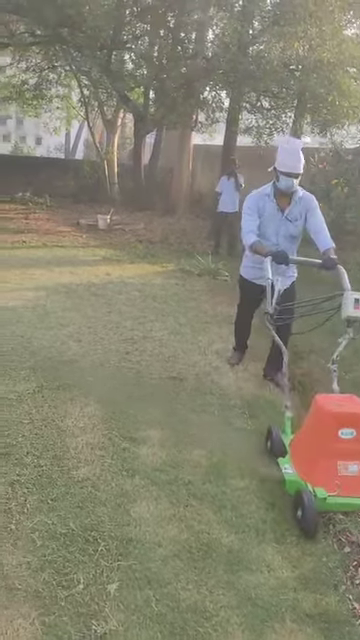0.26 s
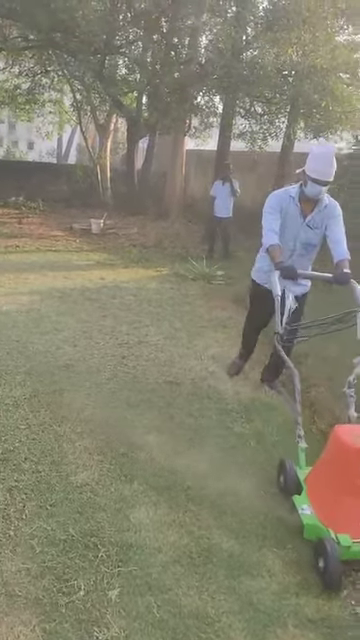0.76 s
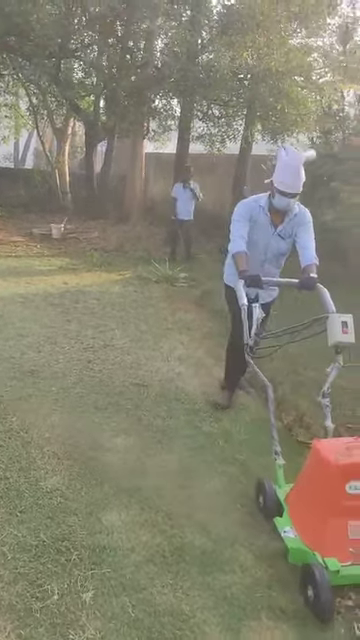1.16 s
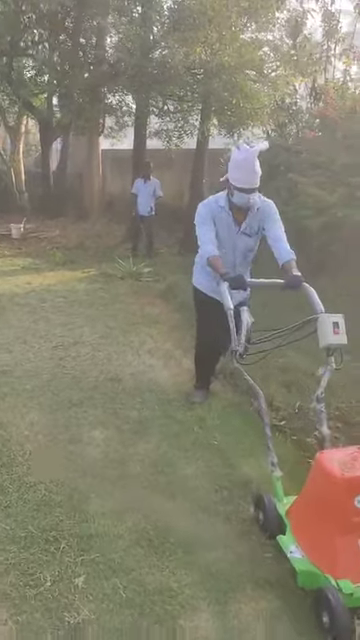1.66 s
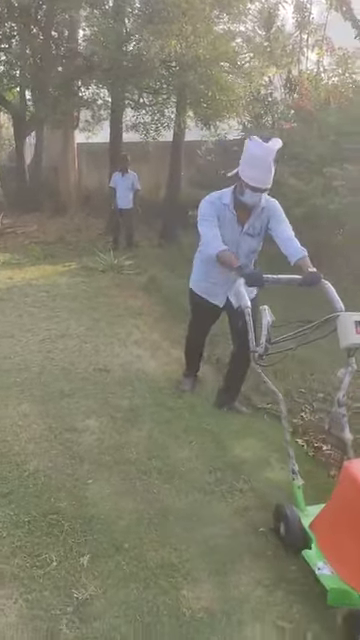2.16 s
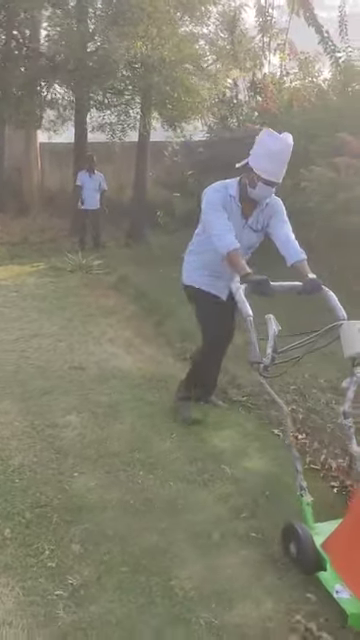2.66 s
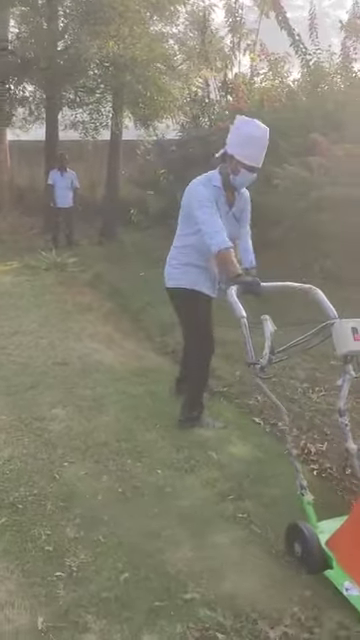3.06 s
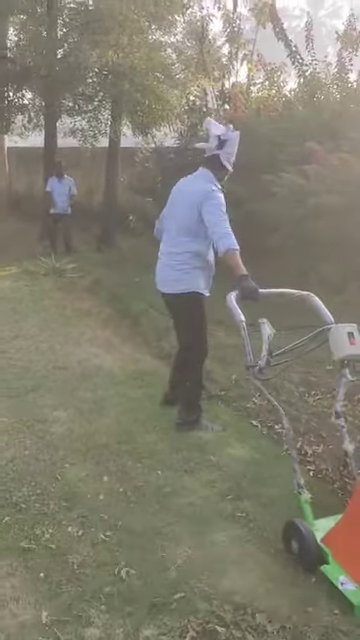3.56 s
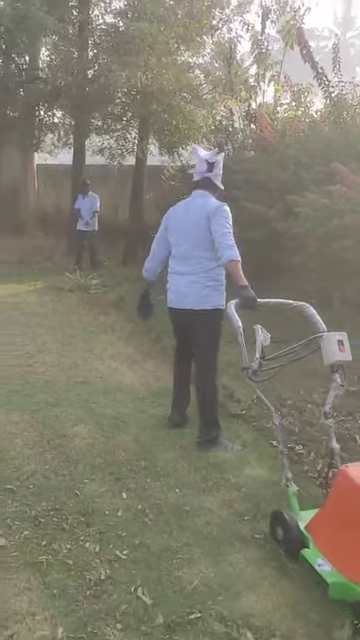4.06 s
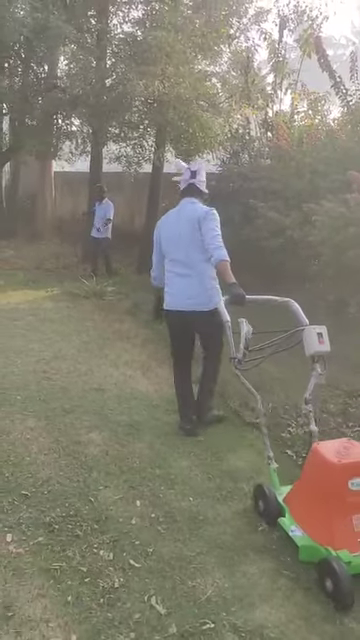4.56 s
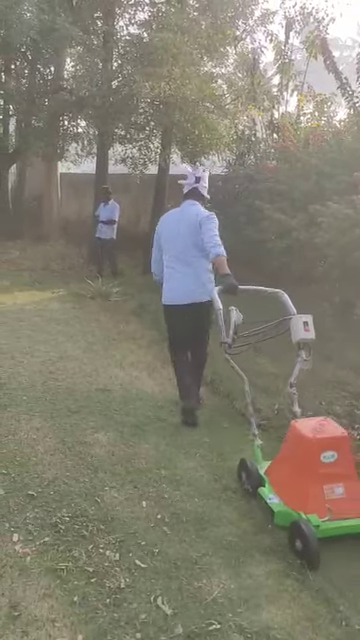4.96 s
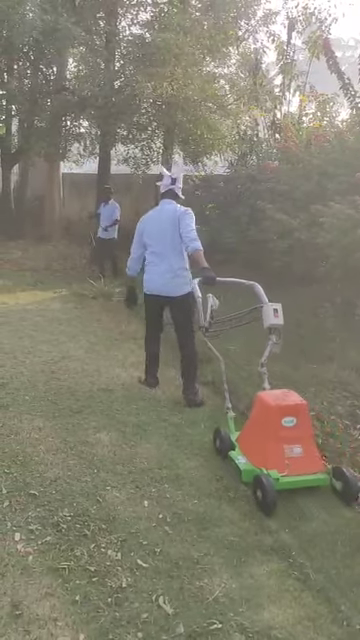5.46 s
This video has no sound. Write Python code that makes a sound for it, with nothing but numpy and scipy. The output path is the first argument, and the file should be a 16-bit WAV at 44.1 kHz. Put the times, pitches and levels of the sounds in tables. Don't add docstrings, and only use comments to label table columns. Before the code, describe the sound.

For about 5.7 seconds an electric rotary mower runs continuously a few steps away on an open lawn. A low hum near 100 Hz, with a stronger octave above, rises very slightly over the first two seconds and then holds, its overtones wavering as the deck rocks. Around it is a broad, airy midrange roar, fullest from about 2 to 5 seconds and easing near the end. Shredded grass and dry leaves hiss in grainy bursts, strongest around 2.2 seconds and much thinner after 3.6. Short hard ticks of twigs and stones come at about 0.8, 1.5, 1.8, 2.1, 2.6, 3.1-3.4, 4.0 and 4.2 seconds. A distant hoarse crow caws at 0.8, 1.7, 2.6 and, fainter, 3.3; tiny falling chirps come at 4.9 and 5.55. The phone stereo is left-weighted in the lows, with shifting phase, narrow ringing highs and patchy, compressed treble.

```python
import sys
import numpy as np
from scipy import signal
from scipy.fft import rfft, irfft, dct, next_fast_len
from scipy.io import wavfile
from scipy.ndimage import uniform_filter1d

SR = 44100
rng = np.random.default_rng(int(sys.argv[2]) if len(sys.argv) > 2 else 0)


def to_linear_factor(level_db):
    exponent = np.asarray(level_db, float) / 20
    return 10 ** exponent


def master(y):
    cut = np.clip(np.atleast_2d(y).T, -1, 1)
    pcm = np.round(cut * 32767)
    wavfile.write(sys.argv[1], SR, pcm.astype(np.int16))


N = 252232
TIME = np.arange(N) / SR


def evened(x):
    return x / np.sqrt(np.mean(x ** 2) + 1e-20)


def read(points, hz):
    f, value = np.transpose(points)
    return np.interp(np.log(hz + 1), np.log(f + 1), value)


def column(rows, count):
    columns = np.transpose(rows)
    return np.interp(TIME, columns[0], columns[count])


def swells(rows):
    s, db, width = np.transpose(rows)
    coarse = TIME[::64]
    bells = np.exp(-((coarse[:, None] - s) / width) ** 2)
    return np.interp(TIME, coarse, bells @ db)


def wander(top_hz, count):
    size = next_fast_len(N)
    z = rfft(rng.standard_normal((count, N)), size)
    z = z / (1 + (np.fft.rfftfreq(size, 1 / SR) / top_hz) ** 4)
    return evened(irfft(z, size)[:, :N])


def air(shape, patchy_db, size):
    hz = np.fft.rfftfreq(size, 1 / SR)
    a, b, c, d, patches = rng.standard_normal((4 * N // size + 5, len(hz), 5)).T
    patches = uniform_filter1d(patches, size=8, axis=0)
    patches = evened(uniform_filter1d(patches, size=10, axis=1))
    z = np.array([a + 1j * b, c + 1j * d])
    z = z * to_linear_factor(read(shape, hz)[:, None] + patchy_db * patches)
    return signal.istft(z, nperseg=size, noverlap=3 * size // 4)[1][:, :N]


def band_rms(x, lo_hz, hi_hz):
    power, hz = abs(rfft(x)) ** 2, np.fft.rfftfreq(N, 1 / SR)
    return np.sqrt(2 * power[(hz > lo_hz) & (hz < hi_hz)].sum()) / N


# start_s, start_hz, end_hz, length_s, level_db
CHIRPS = [
    (4.905, 4750, 4050, .06, -46),
    (5.55, 4700, 4200, .055, -48),
]


def songbird():
    out = np.zeros(N)
    for start, start_hz, end_hz, length, db in CHIRPS:
        u = np.clip((TIME - start) / length, 0, 1)
        hz = start_hz + (end_hz - start_hz) * u
        whistle = np.sin(2 * np.pi * np.cumsum(hz) / SR)
        flutter = 1 + 0.62 * wander(170, count=1)[0]
        out += to_linear_factor(db) * np.sin(np.pi * u) * flutter * whistle
    return out


# start_s, length_s, top_hz, level_db
CAWS = [
    (.84, 0.25, 1582, -39.5),
    (1.73, 0.22, 1600, -40),
    (2.559, 0.252, 1696, -39.5),
    (3.34, .25, 1575, -43),
]


def crow():
    rise = 0.28
    first, sag, drop = 0.86, 0.0426, 0.0585
    out = np.zeros(N)
    for start, length, top_hz, db in CAWS:
        u = np.clip((TIME - start) / length, 0, 1)
        bend = first + (1 - first) * np.minimum(u / rise, 1)
        bend = bend - sag * np.maximum(u - rise, 0) - drop * u ** 4
        hz = top_hz * bend * (1 + 0.0039 * wander(84, count=1)[0])
        angle = 2 * np.pi * np.cumsum(hz) / SR
        rasp = 1 + 0.55 * wander(160, count=1)[0]
        swell = abs(np.sin(np.pi * u)) ** 0.47
        out += to_linear_factor(db + 5) * rasp * swell * (np.sin(angle) + 0.11 * np.sin(angle * 4 / 3))
    return out


# time_s, blade_pass_hz
SPEED = [(0, 98.1), (.5, 98.4), (.8, 98.75), (1.25, 98.8), (1.6, 99.3), (2.3, 99.55), (2.8, 99.42),
         (4, 99.45), (5.72, 99.35)]


def blade_angle():
    return 2 * np.pi * np.cumsum(column(SPEED, count=1)) / SR


# time_s, roar_db, hiss_db
EFFORT = [(0.0, -32.5, -34.5), (0.03, -36.5, -35), (0.09, -35, -37.5), (0.46, -34.5, -34.5),
          (0.72, -36.5, -36), (0.83, -34, -35), (1.23, -34, -38), (1.67, -34.5, -36), (2.12, -34.5, -33.5),
          (2.2, -33, -32), (3.38, -32.5, -34), (3.44, -34.5, -35.5), (3.63, -33, -39), (5.32, -37, -44),
          (5.7, -38, -44), (5.72, -33, -49)]


def effort_db():
    return column(EFFORT, count=1), column(EFFORT, count=2)


# pitch_hz, level_db per Hz
ROAR = [(25, -8), (50, -18), (75, -6.5), (120, -7.5), (170, 3), (240, 10), (350, 4.5), (450, -0.5),
        (850, 0.5), (1100, -2.5), (1600, -10), (2200, -13.5), (4000, -17.5), (9000, -53.5)]


def roar():
    x = air(ROAR, patchy_db=1.2, size=2048)
    throb = 1 + 0.075 * np.cos(blade_angle()) + 0.044 * np.cos(2 * blade_angle())
    return x * throb / band_rms(x[0], 578, 1830) * to_linear_factor(effort_db()[0])


TONES_DB = [-2, 5.5, -1.5, -3.5]
# time_s, change_db, half_width_s
ROCK_1 = [
    (0.0, 1.5, 0.063),
    (0.8, -1, 0.13),
    (1.3, -6.5, 0.18),
    (2.5, 0.5, .15),
    (3.2, -3.5, 0.14),
    (4.199, 2, 0.4),
    (5.18, -4, 0.044),
]
ROCK_2 = [(.17, -14, .08), (.36, 4, .05), (.49, -17.5, 0.086), (.72, 4, 0.075), (.85, -11.5, 0.076),
          (1.02, 4, 0.078), (1.65, -4, 0.037), (1.93, -7, 0.021), (2.21, -12.5, 0.083), (2.42, 1.5, 0.084),
          (2.62, -12, 0.12), (3.3, 4, 0.66), (3.93, 3, 0.061), (4.08, -10.5, 0.067), (4.18, 4.5, 0.075),
          (4.43, -6.5, .04), (4.95, 1.5, 0.027), (5.25, 7.5, .05), (5.4, -6.5, .04), (5.55, 3.5, .12)]
ROCK_3 = [(.05, -15.5, 0.042), (.19, -7, 0.035), (.42, 8, 0.049), (.56, -10.5, 0.026), (.64, 6, 0.11),
          (1.27, 6, 0.16), (1.77, 6, 0.038), (1.94, -10, .04), (2.3, 7.5, 0.17), (2.55, 3, 0.037),
          (2.78, -8.5, 0.064), (2.9, 7.5, 0.15), (3.2, -11, 0.027), (3.34, 1, 0.071), (3.56, -15.5, 0.046),
          (3.76, 7.5, 0.079), (4.07, 5.5, 0.046), (4.25, -6, 0.1), (4.459, 9, .05), (4.88, 6, 0.064),
          (4.95, -14, 0.028), (5.04, 4, .05), (5.23, -3, 0.026), (5.36, 6, 0.084), (5.62, -23, 0.15)]
ROCK_4 = [(.1, 7, 0.066), (.4, -8.5, .05), (.59, 9, 0.091), (.87, 4.5, 0.12), (1.1, 6, 0.022),
          (1.65, 5.5, 0.57), (2.21, -4, 0.055), (2.55, -9, .03), (2.82, 7, 0.14), (3.1, -0.5, 0.059),
          (3.45, -2.5, 0.24), (3.95, 3, 0.13), (4.17, 3.5, .05), (4.57, 4, .05), (4.73, -5.5, 0.054),
          (5.03, -2.5, .04), (5.17, 6, 0.021), (5.5, 3.5, 0.06)]
# order, level_db against the roar
ORDERS_DB = [(1, -13.5), (3, -0.5), (5, -26), (7, -6), (10, -7), (12, -8), (14, -4.5), (16, -10),
             (18, -7.5)]


def hum():
    angle, roar_db = blade_angle(), effort_db()[0]
    shakes = (0.045, 0.077, 0.18, 0.17)
    rocks = (ROCK_1, ROCK_2, ROCK_3, ROCK_4)
    out = 0
    for k, shake, db, rock in zip(range(1, 5), shakes, TONES_DB, rocks):
        re, im = wander(6.6, count=2)
        path = 2 * np.pi * rng.random() + 0.59 * wander(0.47, count=1)[0]
        tone = (1 + shake * (re + 1j * im)) * np.exp(1j * (k * angle + path))
        out = out + to_linear_factor(-31 + 0.57 * (roar_db + 36) + db + swells(rock)) * tone.real
    for order, db in ORDERS_DB:
        re, im = wander(6.2, count=2)
        line = (0.5 + 0.5 * (re + 1j * im)) * np.exp(0.5j * order * angle)
        out = out + to_linear_factor(roar_db + db) * line.real
    return out


# pitch_hz, level_db per Hz
HISS = [(300, -17), (1500, 6.5), (2400, -6.5), (2900, 5.5), (3500, -6), (4000, 1), (4250, -22.5),
        (4550, -1), (5300, 0), (5600, -3), (10000, -0.5), (11200, -11.5), (14000, -11), (15500, -16)]
# time_s, change_db, half_width_s
MOUTHFULS = [(.03, 2, 0.018), (.605, 4.5, 0.016), (.87, 2, 0.057), (1.07, 2.5, 0.054), (1.37, -1, .03),
             (1.535, 4.5, 0.0096), (1.67, 2.5, 0.094), (1.92, 1.5, 0.033), (2.08, 1, 0.034),
             (2.105, -3, 0.019), (2.15, -0.5, 0.013), (2.175, -4, 0.011), (2.24, 0, .03), (2.37, 3, 0.017),
             (3.1, 3.5, 0.029), (3.26, 2, 0.064), (3.335, -0.5, .015), (3.36, 4.5, 0.005), (5.51, 1, .04)]
# start_s, level_db, decay_t60_s
STRIKES = [(0.8043, -8, 0.025), (0.856, -20, 0.028), (1.522, -10, 0.039), (1.5643, -29, 0.026),
           (1.8243, -14.5, 0.03), (2.0753, -11.5, 0.027), (2.2448, -22, 0.034), (2.5157, -20, 0.042),
           (2.582, -7.5, 0.026), (3.0624, -9, 0.014), (3.0839, -15, 0.024), (3.202, -11.5, 0.032),
           (3.359, -11, 0.036), (4.0306, -12, 0.019), (4.2045, -6.5, 0.01), (5.5518, -22, 0.044)]


def shredding():
    x = air(HISS, patchy_db=1.5, size=512)
    x = x / band_rms(x[0], 5840, 11100)
    bursts = to_linear_factor(0.7 * wander(83, count=1)[0]) * (1 + 0.095 * np.cos(blade_angle()))
    snaps = to_linear_factor(4.9 * np.minimum(rng.exponential(1, N), 4)) * (rng.random(N) < 250 / SR)
    bursts = bursts + 0.082 * signal.oaconvolve(snaps, to_linear_factor(-60 * TIME[:900] / 0.0055))[:N]
    level = to_linear_factor(effort_db()[1] + swells(MOUTHFULS) - 8) * bursts
    for start, db, t60 in STRIKES:
        after = np.maximum(TIME - start, 0)
        level = level + to_linear_factor(db - 26.5 - 60 * after / t60) * (TIME > start)
    return x * level


# time_s, share
ASIDE = [(0, -.45), (.25, -.1), (.75, 0), (1, .5), (1.4, .8), (2.4, 1), (4.2, .95), (4.8, .5), (5.1, .05),
         (5.45, 0), (5.72, -.45)]
# pitch_hz, lead_rad
LEAD_AHEAD = [(450, 0), (1210, .9), (1720, .2), (2000, 2.2), (2700, 3.1), (3300, 2.6), (3900, 3.1),
              (4600, 3.35), (5500, 4), (6800, 6.2), (8000, 9), (9000, 9.4), (15000, 11)]
LEAD_ASIDE = [(450, 0), (1460, 1.5), (1810, .8), (2150, 2.8), (2700, 3.2), (4100, 3.6), (4500, 5.5),
              (6000, 6.3), (7100, 9.3), (8180, 12), (9900, 11.3), (15000, 17)]
# pitch_hz, likeness
SAME = [(30, .4), (55, .8), (75, .99), (400, .99), (1000, .87), (1300, .77), (1700, .45), (2200, .55),
        (2680, .92), (3100, .5), (4050, .88), (5000, .65), (5900, .75), (7000, .72), (8500, .45),
        (10000, .15)]
# pitch_hz, level_db
RIGHT_DB = [(400, -9.5), (600, -3.5), (850, -6.5), (1200, -7.5), (1700, -4), (2000, -6.5), (2650, 0.5),
            (3000, -3.5), (4200, 0), (4600, -2.5), (5500, -2), (8000, 8), (9000, -3), (9700, -17.5),
            (15000, -9)]


def ports(direct, scattered):
    hz, t, (a, b) = signal.stft(np.array([direct, scattered]), SR, nperseg=1024, noverlap=768)
    aside = np.interp(t, *np.transpose(ASIDE))
    lead = np.outer(read(LEAD_AHEAD, hz), 1 - aside) + np.outer(read(LEAD_ASIDE, hz), aside)
    lead = lead * (hz > 450)[:, None]
    same = np.clip(read(SAME, hz), 0, 1)[:, None]
    right = same * a * np.exp(-1j * lead) + np.sqrt(1 - same ** 2) * b
    right = to_linear_factor(read(RIGHT_DB, hz))[:, None] * right
    return signal.istft(np.array([a, right]), SR, nperseg=1024, noverlap=768)[1][:, :N]


def scene():
    direct, scattered = roar() + shredding()
    caws, chirps = crow(), songbird()
    right_birds = to_linear_factor(-16) * np.roll(caws, -4) + to_linear_factor(-27.5) * np.roll(chirps, -4)
    return ports(direct + hum(), scattered) + np.array([caws + chirps, right_birds])


# pitch_hz, level_db per line
LINE_STEP = [(800, -50), (1500, -40), (1900, -31), (2700, -32.5), (3000, -36), (3600, -33.5), (5500, -33),
             (7200, -30.5), (8300, -33), (11000, -35.5), (14500, -40)]
# pitch_hz, level_db per line
QUIET = [(9000, -75), (13600, -50), (14300, -44), (15300, -38)]


def round_lines(x):
    first = 71
    joint_hz = 7600
    muted_under = 0.42
    window = signal.windows.kaiser_bessel_derived(2048, 4 * np.pi)
    padded = np.pad(x, ((0, 0), (1024 - first, 3072)))
    blocks = np.lib.stride_tricks.sliding_window_view(padded, 2048, axis=1)[:, ::1024] * window
    a, b, c, d = np.split(blocks, 4, axis=2)
    folded = np.concatenate([-c[..., ::-1] - d, a - b[..., ::-1]], axis=2)
    z = dct(folded, type=4, norm="ortho")

    hz = np.arange(1024) * SR / 2048
    joint = hz < joint_hz
    around_db = 10 * np.log10(uniform_filter1d((z ** 2).sum(0), size=72, axis=1) + 1e-12)
    louder_db = around_db - np.median(around_db, axis=0)
    step = np.maximum(to_linear_factor(read(LINE_STEP, hz) + 0.97 * louder_db), to_linear_factor(read(QUIET, hz)))
    right_step = step * to_linear_factor(-6 * np.clip(hz / 3000 - 3.3, 0, 1))
    step = np.array([step, right_step]) * (1 + joint)

    z = np.where(joint, [z[0] + z[1], z[0] - z[1]], z)
    patch_power = uniform_filter1d(uniform_filter1d(z ** 2, size=7, axis=2), size=2, axis=1)
    z = z * (patch_power > (muted_under * step) ** 2)
    z = np.sign(z) * step * np.floor((abs(z) / step) ** 0.75 + 0.4054) ** (4 / 3)
    z = np.where(joint, [(z[0] + z[1]) / 2, (z[0] - z[1]) / 2], z)

    p, q = np.split(dct(z, type=4, norm="ortho"), 2, axis=2)
    blocks = np.concatenate([q, -q[..., ::-1], -p[..., ::-1], -p], axis=2) * window
    gated = (blocks[:, 1:, :1024] + blocks[:, :-1, 1024:]).reshape(2, -1)
    return np.concatenate([x[:, :first], gated], axis=1)[:, :N]


def top_cut(x):
    return signal.sosfilt(signal.butter(12, 15560, fs=SR, output="sos"), x)


def record(dry):
    size = next_fast_len(N)
    hz = np.fft.rfftfreq(size, 1 / SR)
    left_port, right_port = (8820, 437, 19.23), (11300, 1100, 14.7)  # pitch_hz, width_hz, level_db
    out = []
    for x, (port_hz, width_hz, db) in zip(dry, (left_port, right_port)):
        lift = (to_linear_factor(db) - 1) / np.sqrt(1 + (2 * (hz - port_hz) / width_hz) ** 2)
        out.append(irfft(rfft(x, size) * (1 + lift), size)[:N])
    return top_cut(round_lines(np.array(out)))


dry = scene()
out = record(dry)
master(out)
```